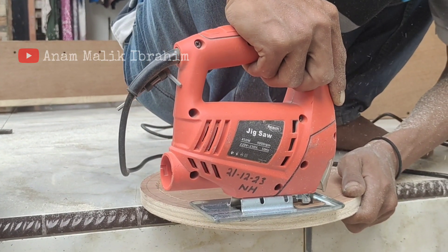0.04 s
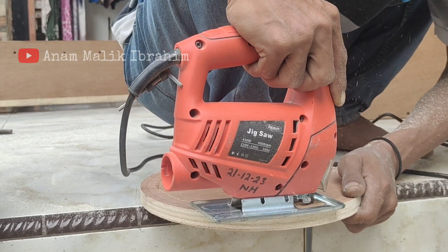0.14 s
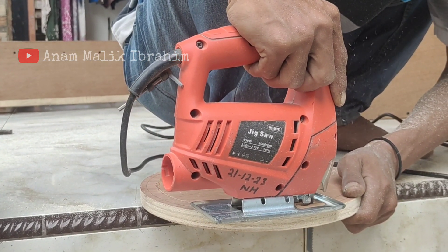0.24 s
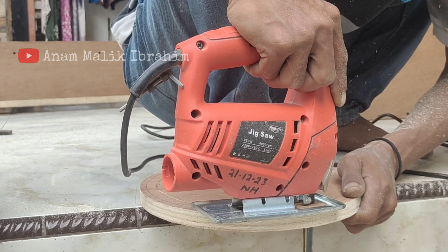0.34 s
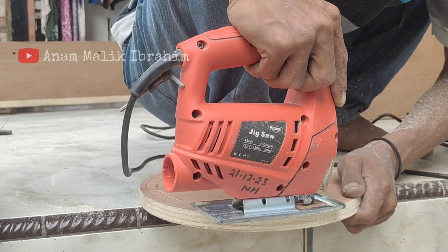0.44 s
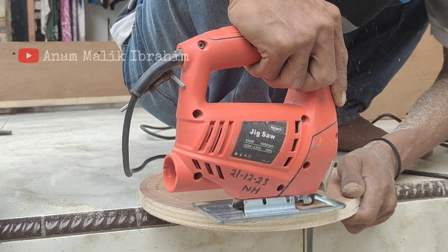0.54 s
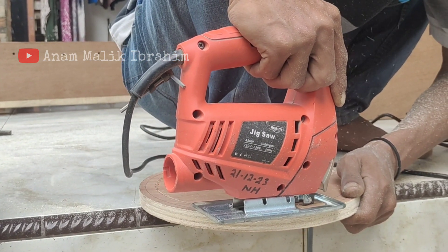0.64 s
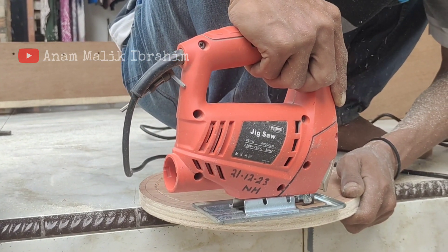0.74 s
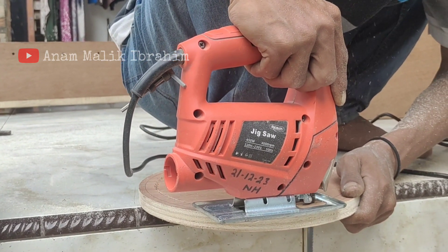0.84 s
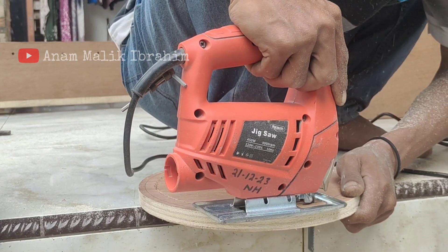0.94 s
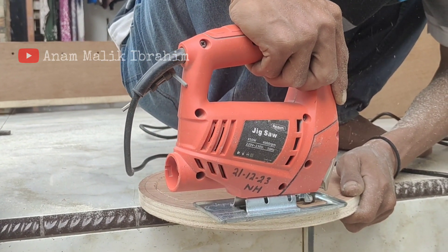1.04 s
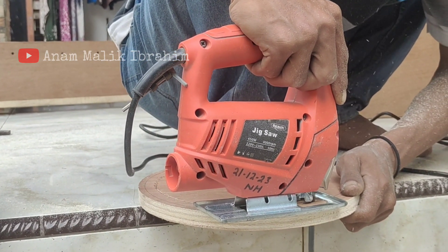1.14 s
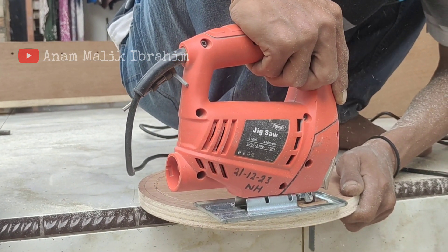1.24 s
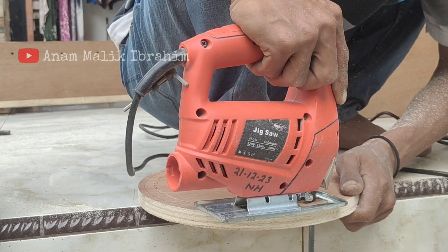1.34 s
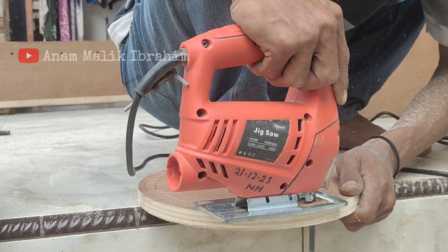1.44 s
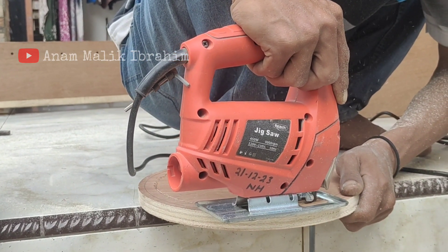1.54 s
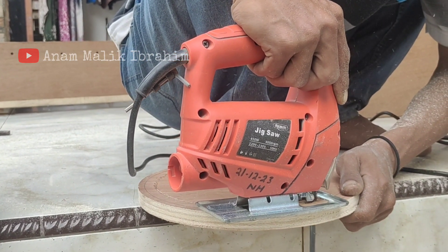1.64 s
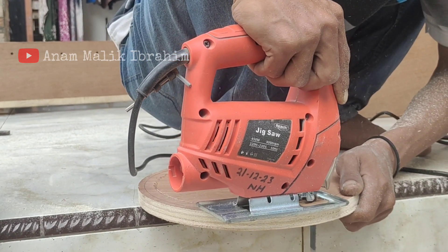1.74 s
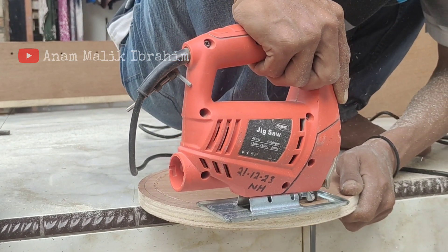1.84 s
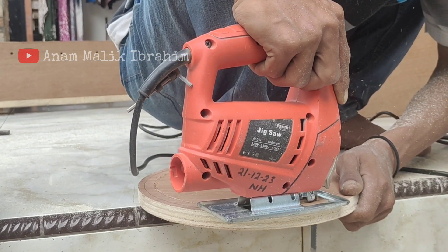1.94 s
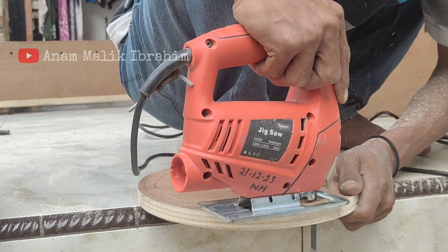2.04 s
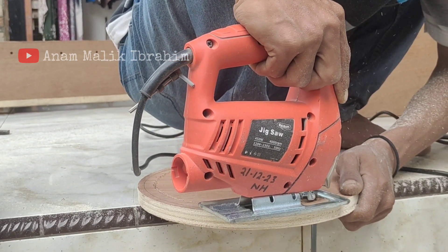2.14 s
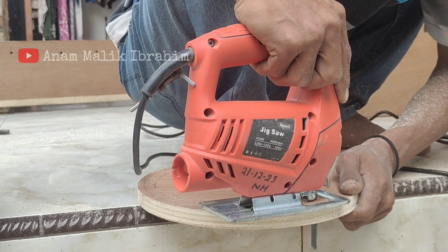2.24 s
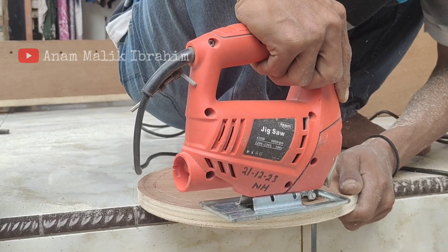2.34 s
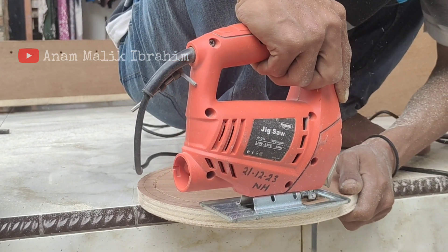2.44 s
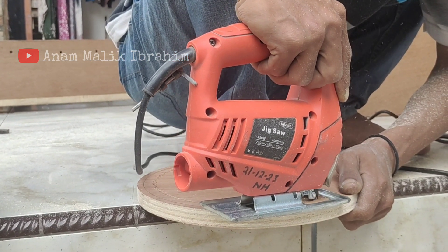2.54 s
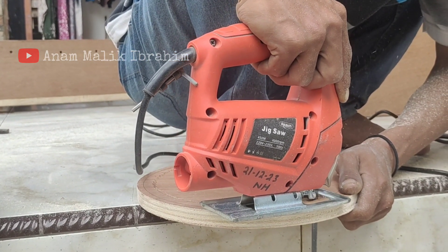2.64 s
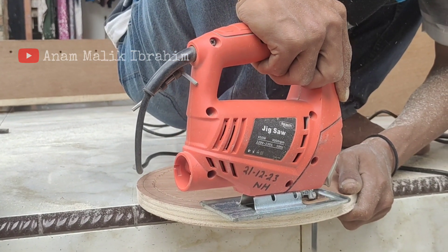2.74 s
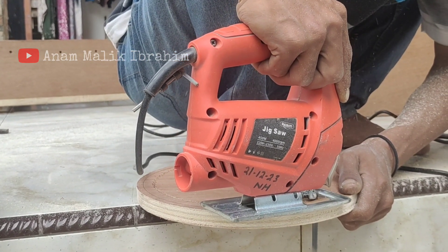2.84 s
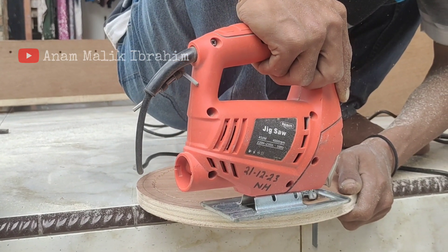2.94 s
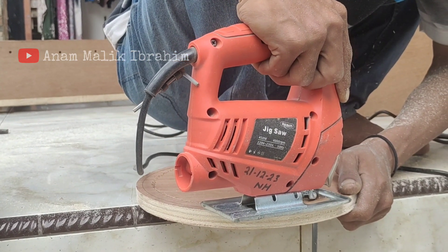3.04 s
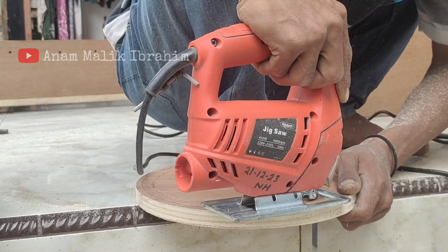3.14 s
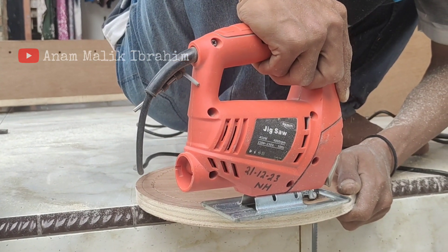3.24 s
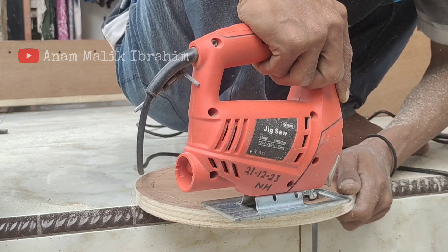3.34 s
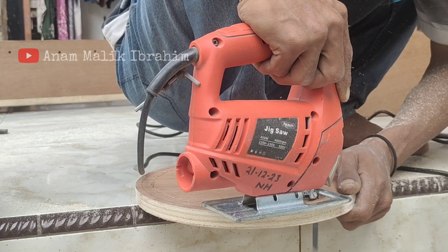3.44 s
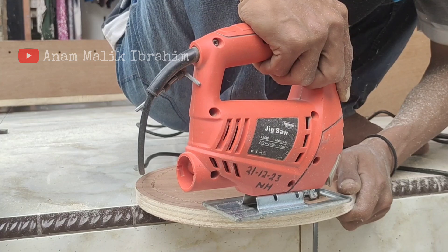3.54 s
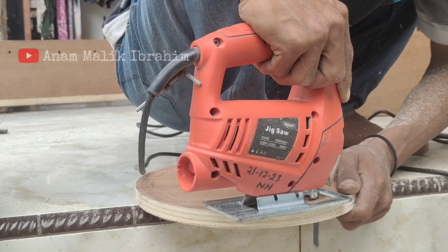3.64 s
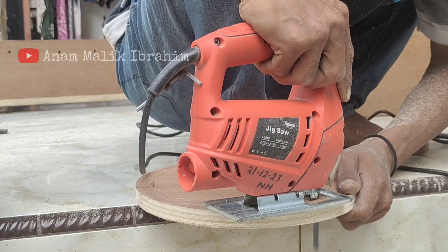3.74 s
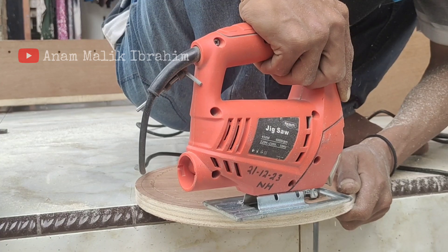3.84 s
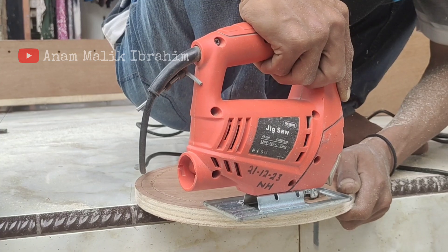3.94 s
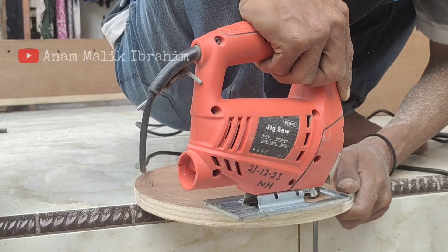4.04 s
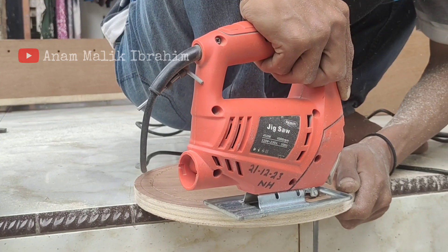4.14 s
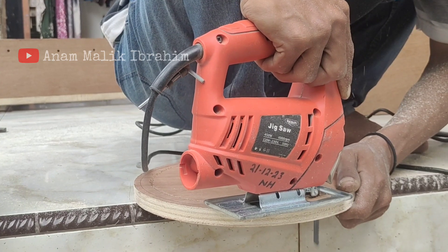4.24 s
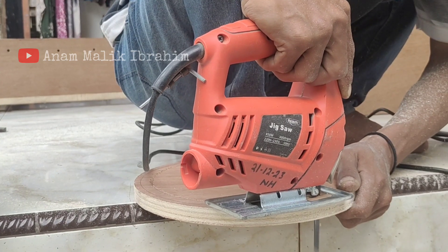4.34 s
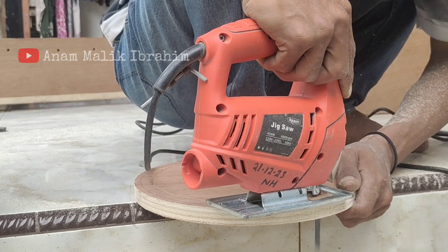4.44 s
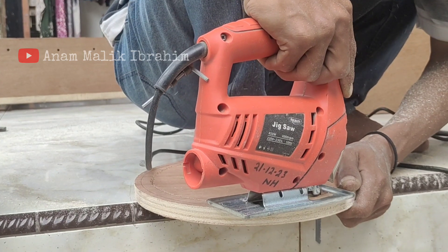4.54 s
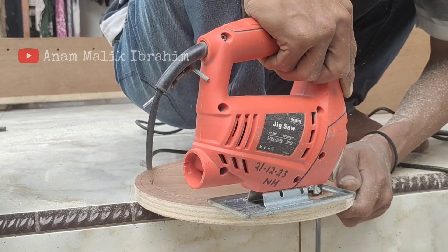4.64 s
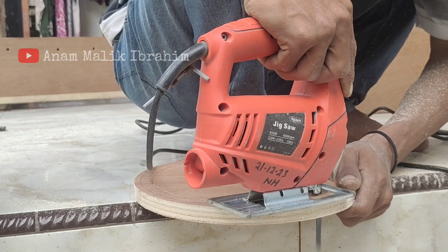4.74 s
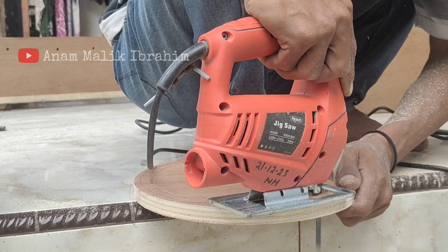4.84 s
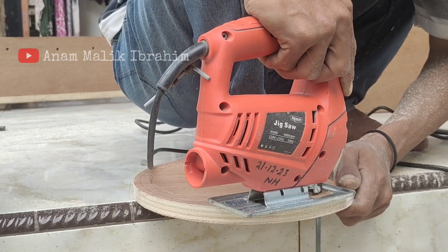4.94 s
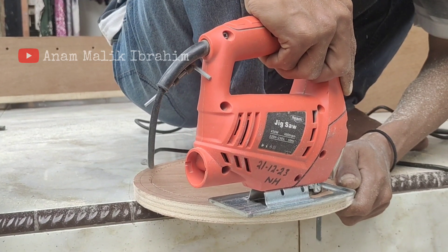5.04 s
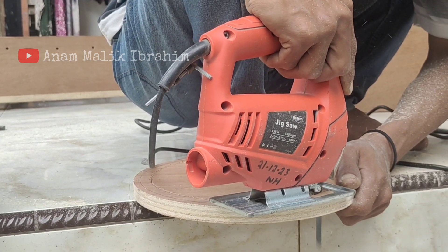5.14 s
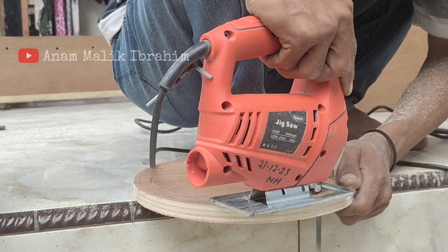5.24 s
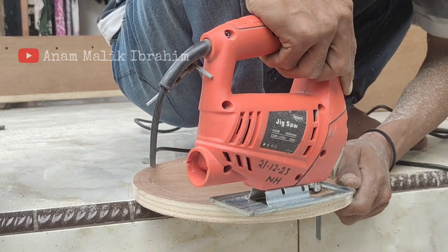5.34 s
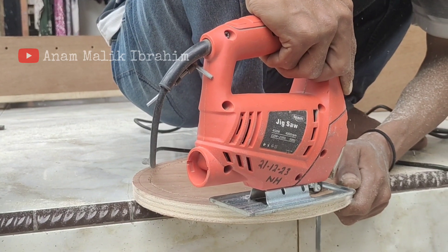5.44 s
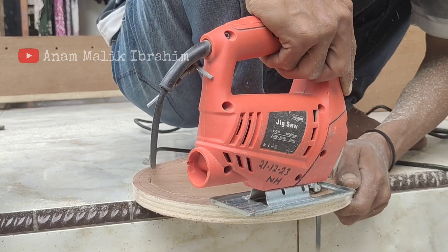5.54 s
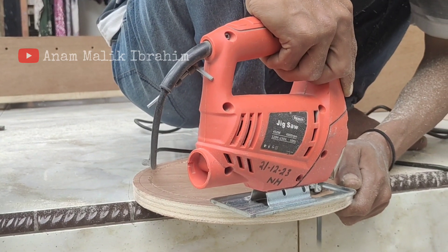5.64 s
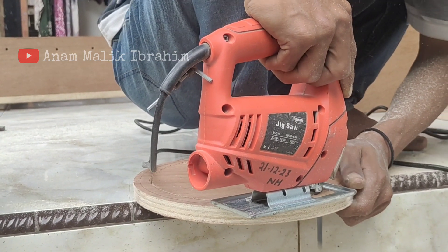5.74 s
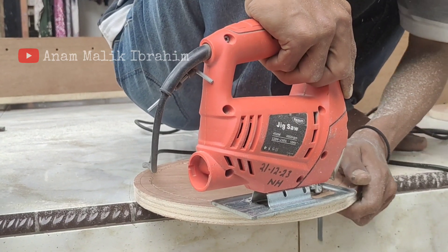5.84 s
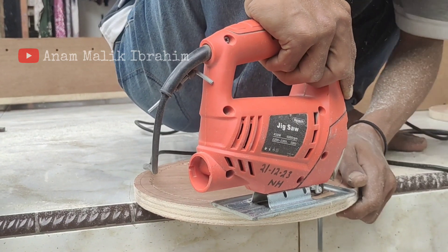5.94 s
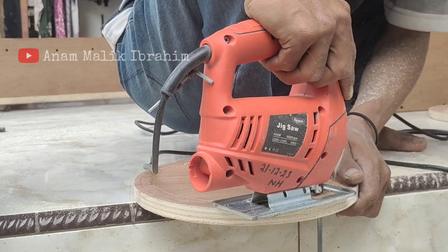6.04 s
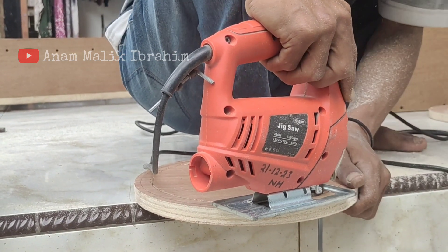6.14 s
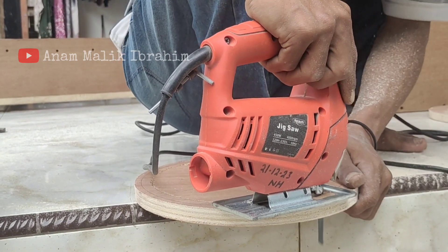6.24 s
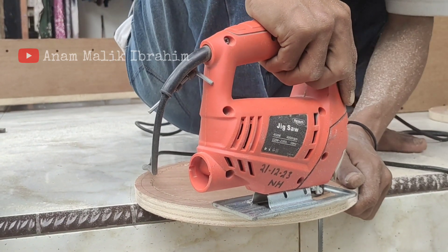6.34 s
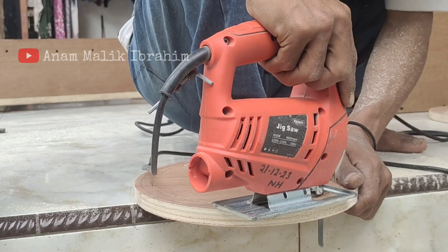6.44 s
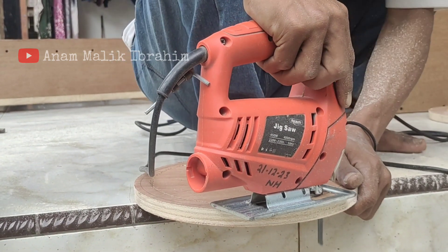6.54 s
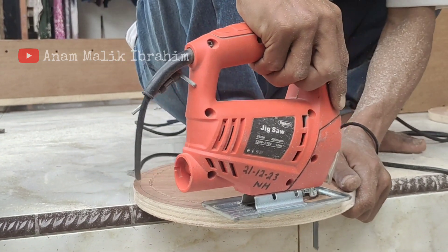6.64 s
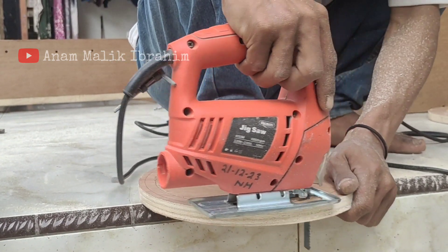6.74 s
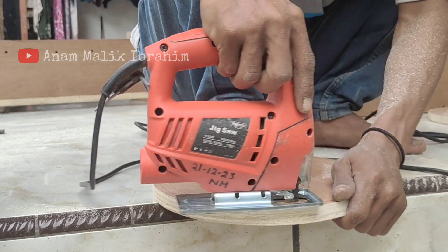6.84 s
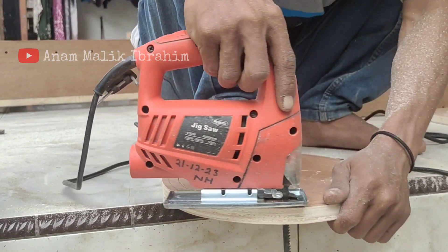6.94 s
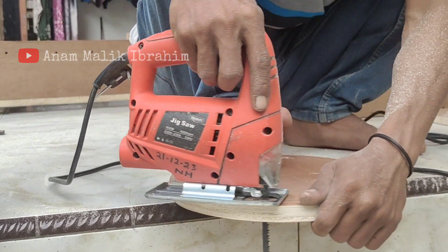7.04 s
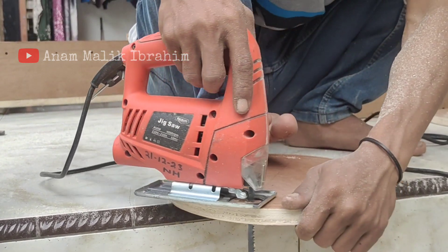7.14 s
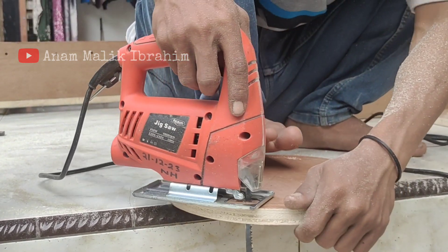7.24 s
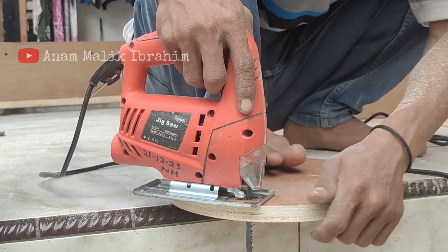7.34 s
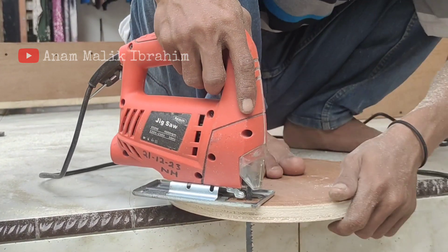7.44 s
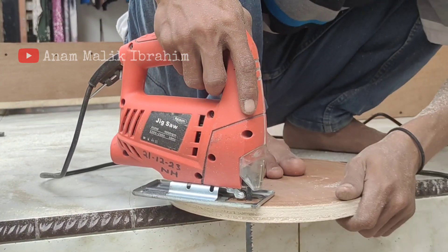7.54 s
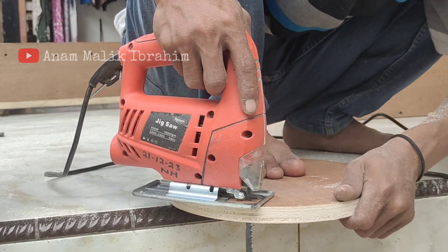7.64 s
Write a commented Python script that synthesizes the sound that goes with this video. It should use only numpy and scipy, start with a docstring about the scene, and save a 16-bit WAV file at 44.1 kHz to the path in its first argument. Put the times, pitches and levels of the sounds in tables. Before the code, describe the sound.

Close, loud and dry with a short hard-room echo: a power saw buzzes at about forty strokes a second, with rough wood rasp, casing rattle and a thin motor whine. Near six seconds power is cut, the drone slides downward and thins into uneven alternating knocks, then quick dying gear ticks. The end is almost silent, with faint rumble and small clicks as tool and board are handled.

```python
"""A harsh, droning buzz fills a hard-floored room: an electric jigsaw cuts plywood close to a phone's two ports.
Switched off, it coasts to a stop through slowing knocks and a last ratchet; handling clicks come around the stop.
A crank drives the blade: the hum sits on multiples of the stroke rate, knocks mark both ends of each stroke,
gear teeth tick and sing, the motor whines, and filtered noise makes the rasp, the room's echo and its quiet air."""
import sys
import numpy as np
from scipy import signal
from scipy.fft import rfft, irfft
from scipy.io import wavfile
from scipy.ndimage import uniform_filter1d

SR = 44100
rng = np.random.default_rng(int(sys.argv[2]) if len(sys.argv) > 2 else 0)


def digitize_waveform(pressure):
    """Quantize a signal to 16-bit integers and store it at the path in sys.argv[1].

    Rows of a 2-D input are taken as channels; values are limited to [-1, 1].
    """
    field = np.atleast_2d(pressure).T
    bounded = np.clip(field, -1, 1)
    quanta = np.round(bounded * 32767).astype(np.int16)
    wavfile.write(sys.argv[1], SR, quanta)


N = 339570
T = np.arange(N) / SR
HZ = np.fft.rfftfreq(N, 1 / SR)


def amp(db):
    """Amplitude factor of a level in dB."""
    return 10 ** (np.asarray(db) / 20)


def evened(x):
    """The signal scaled to rms 1."""
    return x / np.sqrt(np.mean(x ** 2) + 1e-20)


def read(points, hz):
    """A table's value at each frequency or speed, interpolated on a log scale."""
    f, value = np.transpose(points)
    return np.interp(np.log(hz + 1), np.log(f + 1), value)


def drift(hz):
    """Slow chance of rms 1 below a cutoff, one value in 32 samples."""
    return evened(signal.lfilter(*signal.butter(2, hz, fs=SR / 32), rng.standard_normal(len(T[::32]))))


def wander(hz):
    """The same slow chance at every sample."""
    return np.interp(T, T[::32], drift(hz))


# Casing resonances: centre_hz, width_hz, lift_db
CASING_MODES = [(1381, 290, 7), (1650, 33, -10), (1825, 580, 4.5), (2203, 63, -5.5), (2352, 156, 7.5),
                (3740, 410, 3.5), (4720, 1230, 4), (6960, 130, 3.5), (7100, 110, 1), (7380, 120, -7),
                (8230, 180, 1.5)]


def colour(points, lift=1):
    """Causal (minimum-phase) impulse of energy 1: a spectrum shaped by the casing's resonances."""
    hz = np.fft.rfftfreq(4096, 1 / SR)
    modes_db = sum(d / (1 + (2 * (hz - f) / w) ** 2) for f, w, d in CASING_MODES)
    db = read(points, hz) + lift * modes_db
    log_gain = np.log(amp(np.r_[db, db[-2:0:-1]]))
    taps = np.fft.ifft(np.exp(np.conj(signal.hilbert(log_gain)))).real[:2048]
    return taps / np.linalg.norm(taps)


# How far the two ports part, unshared over shared sound: pitch_hz, level_db
STEREO_WIDTH = [(60, -17), (95, -14), (130, -5), (200, -9), (380, -18), (700, -13), (1290, -7), (2380, -7),
                (4400, -3), (15000, -4)]


def noise():
    """Two channels of white noise that share more or less with pitch, least in the high treble."""
    mid, side = rfft(rng.standard_normal((2, N)))
    wide = amp(read(STEREO_WIDTH, HZ))
    both = np.array([mid + wide * side, mid - wide * side])
    return irfft(both / np.sqrt(1 + wide ** 2), N)


OFF_S = 6.0  # from here the tool coasts freely
# Coasting loses this share of its speed a second, plus this many strokes per s a second
DRAG_PER_S, FRICTION = .382, 22.554
# Blade speed under power and just after the switch is released: time_s, strokes_per_s
POWERED_SPEED = [(0.0, 41.27), (0.45, 40.89), (1.1, 41.05), (1.8, 41.25), (2.3, 41.14), (2.7, 40.53),
                 (3.3, 41.11), (3.9, 41.5), (4.6, 41.52), (5.2, 41.3), (5.7, 41.8), (5.762, 41.6),
                 (5.8, 39.3), (5.845, 36.5), (5.9, 34.6), (5.95, 33.2), (6.0, 31.67)]


def strokes():
    """Strokes per second: held by the motor, then worn down by drag and friction."""
    held = np.interp(np.minimum(T, OFF_S), *np.transpose(POWERED_SPEED))
    rest = FRICTION / DRAG_PER_S
    coasting_s = np.maximum(T - OFF_S, 0)
    return np.maximum((held + rest) * np.exp(-DRAG_PER_S * coasting_s) - rest, 0)


CRANK_START, GEAR_TEETH = .92, 48  # turns, teeth a turn


def crank():
    """Turns of the crank: its start position plus the summed stroke rate."""
    return CRANK_START + np.cumsum(strokes()) / SR


def passes(turns):
    """Samples where a whole turn is completed."""
    return np.flatnonzero(np.diff(np.floor(turns)))


# What each part gives off at a speed, before its other gains:
# strokes_per_s, rasp_db, rasp_bass_lift_db, rasp_treble_lift_db, hum_change_db, gear_db
OUTPUT_BY_SPEED = [(0.298, -81, 7, 10, -45, -70), (1.5, -69, 6.5, 7, -35, -73),
                   (4, -63, 1.5, 11, -33.5, -62), (7, -60, 5, 16, -29, -57), (12.5, -61, 8, 23.5, -13, -56),
                   (21.6, -50.5, 6.5, 14, -10, -68), (28.4, -49, 8.5, 12.5, -2.5, -54),
                   (40.5, -44.5, -1.5, 6.5, -2, -59)]


def level(part):
    """Level in dB of one part as the speed dictates; -120 at rest."""
    rows, speed = np.transpose(OUTPUT_BY_SPEED), strokes()
    column = ["rasp", "bass", "treble", "hum", "gear"].index(part) + 1
    return np.where(speed > 0, read(np.transpose([rows[0], rows[column]]), speed), -120)


# How hard the tool bears on the board: time_s, hum_db before the change by speed, extra_rasp_treble_db
BEARING_ON_BOARD = [(0.0, -46, -1), (1.16, -44.5, 0), (1.31, -49, -0.5), (1.34, -44.5, -0.5),
                    (2.61, -48, 0.5), (2.79, -42, 1), (2.85, -47, 0.5), (3.09, -45, 0.5), (3.6, -46.5, 0),
                    (4.13, -43.5, 0.5), (4.97, -44, 0), (5.72, -43.5, -1.6)]


def bearing(column):
    """One dB column of the pressure on the board over time."""
    rows = np.transpose(BEARING_ON_BOARD)
    return np.interp(T, rows[0], rows[column])


# Hum make-up early and late in the cut: multiple of the stroke rate, relative level_db
HUM_EARLY = [(1, -52), (2, -36), (3, -30), (4, -32), (5, -28), (6, -30), (7, -15), (8, -18), (9, -10),
             (10, -9), (11, -3), (12, -17), (13, -18), (14, -19), (15, -13), (16, -2), (17, 0), (18, -8),
             (19, -6), (20, -5), (21, -8), (22, -15), (23, -16)]
HUM_LATE = [(1, -47), (2, -39), (3, -31), (4, -39), (5, -27), (6, -30), (7, -18), (8, -20), (9, -7),
            (10, -13), (11, -10), (12, -19), (13, -14), (14, -19), (15, -11), (16, 0), (17, 0), (18, -7),
            (19, -8), (20, -6), (21, -10), (22, -14), (23, -13)]
HUM_TURNS_S = (2.75, 4.9)  # the board's support shifts between these times
# When in the stroke the hum swells, as a lag added at each multiple: multiple, lag_turns
HUM_PLACE = [(6, .5), (8, .27), (9, .6), (10, .2), (11, .5), (12, .12), (13, .6), (14, .42), (15, .19),
             (17, .34), (18, .8), (19, .45), (20, .75), (21, .64), (23, .7)]
# How readily the board radiates: pitch_hz, level_db
BOARD_RADIATION = [(60, -58.5), (150, -19), (240, -7), (320, 0), (410, 12.5), (470, -2.5), (550, -4.5),
                   (690, 7.5), (950, 4.5)]
SHAFT, OTHERS_FADE_DB = 17, -2  # the multiple spared; the rest sink this far by half speed
STEADY = (11, 17)  # multiples that stay fairly clean while coasting


def hum(turns):
    """The tool shakes alike in every stroke; as it slows, the multiples slide through the board's resonances."""
    t, speed = T[::32], strokes()[::32]
    out, power, lag = 0, 0, 0
    late = np.interp(t, HUM_TURNS_S, [0, 1])
    loose = np.clip(1 - speed / 40, 0, .2)  # unpowered, the strokes lose their evenness
    for (k, early_db), (_, late_db) in zip(HUM_EARLY, HUM_LATE):
        lag += np.interp(k, *np.transpose(HUM_PLACE))
        db = early_db + late * (late_db - early_db)
        power += amp(db) ** 2 / 2
        db *= 1 + 2.6 * loose  # the weaker multiples die first
        db += (k != SHAFT) * OTHERS_FADE_DB * np.clip(2 - speed / 20, 0, 2)
        db += read(BOARD_RADIATION, k * speed) - read(BOARD_RADIATION, k * speed[0])
        rough = loose * (.17 if k in STEADY else .6)
        db += 1.6 * drift(5) + 1.5 * drift(.8) + 18 * rough * drift(25)
        slip = .02 * drift(8) + .6 * rough * drift(25)  # turns
        phase = k * turns - lag + np.interp(T, t, slip)
        out += np.interp(T, t, amp(db)) * np.cos(2 * np.pi * phase)
    gain = amp(bearing(column=1) + level("hum"))
    return gain * out / np.interp(T, t, np.sqrt(power))


# Rasp spectrum before the casing: pitch_hz, relative level_db per Hz
RASP_SPECTRUM = [(60, -81), (110, -37), (230, -30), (380, -11.5), (560, -15), (800, -8), (1250, -11.5),
                 (2400, -13), (2930, -14.5), (5870, -27), (7200, -22.5), (11000, -36), (12800, -37.5),
                 (14200, -34.5), (15500, -34)]
HUSH_DB = -5  # depth of the dip in the rasp above its bass between two reversals
TOP_HZ, TOP_LOSS_DB = 9500, -14  # above this the rasp fades so much more by standstill


def rasp(turns):
    """Teeth in the wood and the motor's fan: noise that swells with blade speed and flutters."""
    half_stroke = 2 * (turns - .385) % 1
    hush = evened(amp(HUSH_DB * uniform_filter1d(half_stroke, size=40)))
    swell_db = 0.47 * wander(27) + 1.76 * wander(375)
    fluttering = noise() * evened(amp(swell_db))
    sound = signal.oaconvolve(fluttering, colour(RASP_SPECTRUM)[None])[:, :N]
    top = signal.sosfiltfilt(signal.butter(4, TOP_HZ, "high", fs=SR, output="sos"), sound)
    sound += top * (amp(TOP_LOSS_DB * np.clip(1 - strokes() / 40, 0, 1)) - 1)
    low = signal.sosfiltfilt(signal.butter(2, 5500, fs=SR, output="sos"), sound)
    bass = signal.sosfiltfilt(signal.butter(2, 1050, fs=SR, output="sos"), sound)
    treble = amp(level("treble") + bearing(column=2)) * (sound - low)
    return amp(level("rasp")) * (amp(level("bass")) * bass + hush * (low - bass + treble))


# Gear tick spectrum before the casing: pitch_hz, relative level_db per Hz
GEAR_SPECTRUM = [(300, -30), (650, -12), (1300, -22), (1800, -3), (2300, 0), (2800, -15), (3800, -13),
                 (4600, -17), (7000, -34), (15000, -54)]


def gear(turns):
    """One uneven tick a tooth: a whine at speed, a ratchet near rest."""
    backlash = .12 * np.minimum(strokes() / 15, 1)  # teeth; it shifts the ticks
    at = passes(GEAR_TEETH * turns + backlash * wander(60))
    at = at[at < (LAST_TEETH[0][0] - .003) * SR]  # the last teeth are played one by one
    ticks = np.zeros(N)
    ticks[at] = amp(1.5 * rng.standard_normal(N)[at]) * np.sqrt(np.gradient(at))
    loose = signal.lfilter([1], [1, -.93], ticks) * noise()  # each tick chatters briefly
    ring = signal.oaconvolve(ticks + 0.18 * loose, colour(GEAR_SPECTRUM)[None])[:, :N]
    return amp(level("gear")) * ring


# Motor whine before the casing's gain: multiple of the stroke rate, level_db
WHINE_TONES = [(118, -64), (236, -63), (354, -66)]
# How the casing lets the whine out: pitch_hz, gain_db
WHINE_CASING = [(2800, -39.5), (3700, 4), (4000, 0), (4500, 2), (5000, -3), (5600, -8), (6300, -16),
                (7500, -4), (8300, -14), (9000, -45)]


def whine(turns):
    """High multiples of the motor's turning, heard as they slide through the casing's resonances."""
    speed, out = strokes(), 0
    for k, db in WHINE_TONES:
        level_db = db + read(WHINE_CASING, k * speed) + 4.7 * wander(12)
        out += amp(level_db) * np.cos(2 * np.pi * (k * turns + .3 * wander(30)))
    return out


# The gear's mesh tone and a side tone, before the change by speed: multiple of the stroke rate, rms level_db
MESH_TONES = [(46, -56), (48, -60)]
# How the mesh tones change with speed: strokes_per_s, change_db
MESH_BY_SPEED = [(7, -35), (11, -13), (14, -7.5), (20, -22), (36, -16), (40, -2)]


def mesh(turns):
    """The teeth meet evenly enough to sing a wavering tone."""
    speed_db, out = read(MESH_BY_SPEED, strokes()), 0
    for k, db in MESH_TONES:
        loudness = np.sqrt(2) * amp(speed_db + db + 2.4 * wander(6.4))
        out += loudness * np.cos(2 * np.pi * (k * turns + 0.09 * wander(14)))
    return out


# Parts of a blow: from_hz, to_hz, late_samples, share of the rattle's length, share of the click
BLOW_BANDS = [(150, 1700, 100, 1, .6), (1760, 2100, 50, .8, 2.2), (2260, 2540, 25, .8, 2.4),
              (2700, 5500, 0, .7, .5), (5500, 16000, 0, 1, .35)]
# Blow spectrum before the casing: pitch_hz, relative level_db per Hz
BLOW_SPECTRUM = [(120, -43.5), (230, -14), (360, 8), (560, -6.5), (1200, -5.5), (1950, -4.5), (2800, -6.5),
                 (3360, -11.5), (4260, -9.5), (6020, -18), (7300, -11), (11000, -49), (15500, -58)]


def blows(at, db, rattle_s, sharp, rise_s=1e-5, bands=BLOW_BANDS, spectrum=BLOW_SPECTRUM, lift=1):
    """A click and a dying noise rattle ring the casing band by band, each band with its own delay."""
    first, out, taps = at.min(), np.zeros((2, N)), colour(spectrum, lift)
    rattle, rise = noise()[:, first:], np.exp(-1 / (rise_s * SR))
    for band_db, (lo, hi, late, share, click) in zip(np.transpose(db), bands):
        train = np.zeros(N - first)
        train[at - first + late] = amp(band_db)
        decay = np.exp(-1 / (share * rattle_s * SR))
        swell = signal.lfilter([1 - rise], np.convolve([1, -rise], [1, -decay]), train)
        part = signal.sosfilt(signal.butter(2, (lo, hi), "band", fs=SR, output="sos"), taps)
        part = part[None] / np.linalg.norm(part)
        struck = click * sharp * train + rattle * swell
        out[:, first:] += signal.oaconvolve(struck, part)[:, :N - first]
    return out


def listed(rows, rattle_s, sharp, **how):
    """Blows at given times: each row holds start_s, then a level_db for each band."""
    rows = np.array(rows)
    return blows((rows[:, 0] * SR).astype(int), rows[:, 1:], rattle_s, sharp, **how)


# The two reversals until the slow knocks begin: place_turns, then mean level_db in each part of a blow
STROKE_ENDS = [(.375, -52, -43.5, -47.5, -45.5, -43), (.89, -54.5, -47, -49.5, -45, -54.5)]
# The hardest reversals, which ring the casing's upper mode: start_s, peak level_db of the ring
HARD_REVERSALS = [(0.1092, -39), (0.157, -37), (0.3406, -40), (0.377, -41), (0.4738, -39), (0.4983, -39),
                  (0.841, -40), (1.0126, -38), (1.0355, -37), (1.1468, -37), (1.2795, -36), (1.7409, -38),
                  (2.0931, -40), (2.1799, -39), (2.2892, -42), (2.3481, -38), (2.374, -38), (2.6174, -38),
                  (2.8634, -39), (2.8888, -38), (3.3518, -38), (3.5703, -38), (3.6431, -38), (3.7155, -36),
                  (3.7399, -39), (3.8367, -39), (3.9569, -38), (4.3181, -38), (4.4383, -38), (4.6069, -37),
                  (4.6803, -38), (4.7292, -40), (4.7516, -38), (4.8728, -39), (4.9207, -38), (5.2599, -41),
                  (5.3792, -40), (5.5243, -41)]
RING_GAIN_DB = 1  # the mode's peak stands this far above the blow that drives it


def reversals(turns):
    """The crank pin slaps across its slot at each end of the stroke, never quite as hard."""
    before_knocks = T < SLOW_KNOCKS[0][0] - .01
    at = [passes(turns[before_knocks] - row[0]) for row in STROKE_ENDS]
    db = np.concatenate([np.tile(row[1:], (len(a), 1)) for a, row in zip(at, STROKE_ENDS)])
    at = np.concatenate(at)
    spread_db = np.array([1.3, 1.5, 1.6, 2.2, 2.6])
    db = db + spread_db * np.clip(rng.standard_normal((N, 5))[at], -3, 2)
    db[:, 4] += 0.9 * np.clip(wander(5.6)[at], -2, 1.5)  # the treble slaps come in bouts
    for s, peak_db in HARD_REVERSALS:
        db[np.argmin(abs(at - s * SR)), 2] = peak_db - RING_GAIN_DB
    return blows(at, db, .0022, 3.5)


# A high mode of the blade clamp: from_hz, to_hz, late_samples, share of the rattle's length, share of the click
CLAMP_BAND = [(6880, 7280, 0, 1, .5)]
PING_DB = -57.5  # level before each ping's own chance


def pings(turns):
    """Once a stroke the blade clamp rings high, in bouts."""
    at = passes(turns[T < OFF_S] - STROKE_ENDS[0][0])
    chance_db = 4 * wander(4)[at] + 2.5 * rng.standard_normal(N)[at]
    db = PING_DB + np.clip(chance_db, -20, 8)
    return blows(at, db[:, None], .004, 2, bands=CLAMP_BAND)


ROOM_T60, ROOM_DB = .2, -16  # decay time s, echo level dB


def room(x):
    """The hard room's echo: sparse dying taps of random sign, one in every 20 samples, on each port."""
    at = np.arange(200, SR // 3, 20)
    taps = np.zeros((2, SR // 2))
    places = at + rng.integers(0, 20, (2, len(at)))
    np.put_along_axis(taps, places, rng.choice([-1., 1.], (2, len(at))), 1)
    taps *= amp(-60 * T[:SR // 2] / ROOM_T60)
    mid, side = rfft(taps / np.linalg.norm(taps[0]))
    side *= amp(read(STEREO_WIDTH, np.fft.rfftfreq(SR // 2, 1 / SR)))
    return signal.oaconvolve(x, irfft(np.array([mid + side, mid - side])), axes=1)[:, :N]


# Room rumble spectrum: pitch_hz, relative level_db per Hz
AIR_SPECTRUM = [(20, -30), (43, -16), (65, -4), (100, 1), (150, -6), (200, -12), (280, -10), (400, -10),
                (600, -17), (900, -22), (1400, -27), (2000, -24), (3000, -26), (5000, -30), (8000, -29),
                (15500, -34)]
AIR_DB = -77  # rms of the rumble
# Far tones before their waver: pitch_hz, rms level_db
FAR_TONES = [(102, -104.5), (334, -89)]


def air():
    """The quiet room: noise shaped to a low rumble, and two wavering far tones."""
    out = amp(AIR_DB) * evened(irfft(rfft(noise()) * amp(read(AIR_SPECTRUM, HZ)), N))
    for hz, db in FAR_TONES:
        loudness = np.sqrt(2) * amp(db + 3.5 * wander(4))
        out = out + loudness * np.sin(2 * np.pi * (hz * T + .12 * wander(4.5)))
    return out


# Reversals heard one by one as the crank slows, hard and soft by turns:
# start_s, level_db before the shares, thud_share_db, treble_share_db
SLOW_KNOCKS = [(6.1574, -38.5, -9, 4), (6.197, -36, -5, 3), (6.241, -37, -10, 3), (6.261, -40, -16, 6),
               (6.284, -36, -11, 3), (6.31, -46, -13, 5), (6.33, -40, -6, 7), (6.36, -50, -13, 8),
               (6.382, -38.5, -10, 4), (6.41, -45, -8, 0), (6.433, -37.5, -11, 3), (6.465, -43.5, -11, 4),
               (6.495, -38.5, -16, 5.5), (6.53, -47, -9, 4), (6.559, -39.5, -10, 3.5), (6.5993, -45, -8, 0),
               (6.636, -39.5, -9, 5), (6.678, -48, -8, 6), (6.7244, -41, -8, 3.5), (6.778, -47, -8, 3),
               (6.844, -38.5, -9.5, -2), (6.931, -48.5, -15.5, 1)]
BOUNCE_S, BOUNCE_DB = (.003, .012), -10  # each knock rebounds once within this time, about so much weaker
KNOCK_BANDS = [(150, 1700, 60, 2.6, .5)] + BLOW_BANDS[1:]  # a slow knock's thud rumbles on


def knocks():
    """Each slowing reversal strikes the casing and rebounds once."""
    rows = np.array([(s, db + thud, db - 1.5, db - 8, db + treble - 3.0, db + treble - 9)
                     for s, db, thud, treble in SLOW_KNOCKS])
    luck = rng.random((len(rows), 6))
    delay_s = BOUNCE_S[0] + luck[:, 0] * (BOUNCE_S[1] - BOUNCE_S[0])
    rebounds = rows + np.c_[delay_s, BOUNCE_DB + 6 * (luck[:, 1:] - .5)]
    return listed(np.r_[rows, rebounds], 0.0046, 0.97, rise_s=.0005, bands=KNOCK_BANDS)


# Hush before a slow reversal in dB at standstill, strokes per s where it sets in, how late it comes (power)
SLACK_DB, SLACK_BELOW, SLACK_SHARP = -13, 20, 3.5


def slack():
    """As the crank slows, the drive runs free and hushes just before each reversal."""
    s = np.transpose(SLOW_KNOCKS)[0]
    way = np.interp(T, s, np.arange(len(s))) % 1  # progress from one knock to the next
    slowness = np.clip(1 - strokes() / SLACK_BELOW, 0, 1)
    return amp(SLACK_DB * way ** SLACK_SHARP * slowness)


# The last gear teeth, heard one by one: start_s, level_db before the shares
LAST_TEETH = [(6.9834, -52), (6.9894, -52), (6.9964, -53), (7.0034, -53), (7.0104, -54), (7.0184, -52),
              (7.0279, -51), (7.0364, -56), (7.0474, -55), (7.0594, -56), (7.0784, -65)]
# A tooth's share in each part of a blow: level_db
TOOTH_SHARES = (-17, -9, -8, -11, -24)
TOOTH_BANDS = [(lo, hi, 20, 1, click) for lo, hi, _, _, click in BLOW_BANDS]  # a tooth sounds all at once


def ratchet():
    """The last gear teeth tick past singly as short blows on the casing."""
    teeth = [(s, *(db + np.array(TOOTH_SHARES))) for s, db in LAST_TEETH]
    return listed(teeth, .0004, 6, bands=TOOTH_BANDS)


# Small clicks as tool and board are handled: start_s, rattle_s before each part's share, level_db in each part
HANDLING_CLICKS = [(7.1105, 0.0037, -94, -92, -90, -88, -62), (7.1185, 0.0033, -74, -80, -62, -80, -84),
                   (7.1826, 0.0041, -60.5, -63, -59, -51, -51), (7.214, .004, -66.5, -71, -68, -88.5, -90),
                   (7.347, 0.0066, -86, -72, -62, -63, -82)]
# Colour of a handling click: pitch_hz, relative level_db per Hz
CLICK_SPECTRUM = [(150, 3), (4700, -3.5), (6000, -7), (7900, -2), (10000, -23), (15500, -20)]
# Parts of a handling click: from_hz, to_hz, late_samples, share of the rattle's length, share of the click
CLICK_BANDS = [(150, 900, 60, 1.5, .8), (900, 1600, 40, 1.2, .6), (1600, 2800, 20, 1.1, .5),
               (2800, 5600, 0, .7, .6), (5600, 15000, 0, .6, .6)]


def clicks():
    """Short clicks, some bright, some lower, without the casing's ring, each with its own length."""
    how = dict(rise_s=0.00027, bands=CLICK_BANDS, spectrum=CLICK_SPECTRUM, lift=0)
    return sum(listed([(s, *db)], length, 2.2, **how) for s, length, *db in HANDLING_CLICKS)


def scene():
    """The saw and its clicks with the room's echo; the hum and the air stay without echo."""
    turns = crank()
    clatter = slack() * (rasp(turns) + gear(turns))
    clatter += whine(turns) + mesh(turns) + reversals(turns) + pings(turns)
    clatter += knocks() + ratchet() + clicks()
    return hum(turns) + clatter + amp(ROOM_DB) * room(clatter) + air()


# Left port over right: pitch_hz, level_db
PORT_LEAN = [(300, 0), (800, 0), (1300, -2), (2000, 1), (2800, 0), (4400, 4.5), (5800, 5), (7000, -4),
             (9000, -2), (12000, 2), (15000, 1)]
# How far the left port leads: pitch_hz, phase_radians
PORT_LEAD = [(0, 0), (2410, 0.1), (2840, -2.9), (3960, -6.1), (4740, -4.8), (5250, -0.7), (6720, 3.3),
             (7490, -2.0), (8180, -0.7), (10200, -0.2), (11100, 2.9), (12500, -2.5), (15200, -6.6),
             (16100, -11.9)]
# The phone thins the bass below this pitch as the sound grows 12 dB past the last level
DUCK_HZ, DUCK_DB, DUCK_FROM_DB = 104, -5, -54
EDGE_HZ = 15550  # upper band limit


def record(dry):
    """Loud sound loses deep bass, the phone's two ports differ in level and phase with pitch; then the band limit."""
    power_db = 10 * np.log10(abs(uniform_filter1d((dry ** 2).mean(0), size=8000)) + 1e-12)
    deep = signal.sosfiltfilt(signal.butter(3, DUCK_HZ, fs=SR, output="sos"), dry)
    loudness = np.clip((power_db - DUCK_FROM_DB) / 12, 0, 1)
    dry = dry + deep * (amp(DUCK_DB * loudness) - 1)
    hz = np.fft.rfftfreq(512, 1 / SR)
    lean = amp(read(PORT_LEAN, hz) / 2) * np.exp(.5j * read(PORT_LEAD, hz))  # half to each port
    ports = np.roll(irfft(np.array([lean, 1 / lean])), 256, axis=1) * np.hanning(513)[:512]
    heard = signal.oaconvolve(dry, ports, axes=1)[:, 256:N + 256]
    edge = signal.firwin(511, EDGE_HZ, window=("kaiser", 9), fs=SR)
    return signal.oaconvolve(heard, edge[None], "same")


dry = scene()
out = record(dry)
digitize_waveform(out)
```